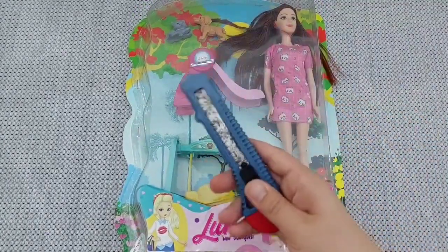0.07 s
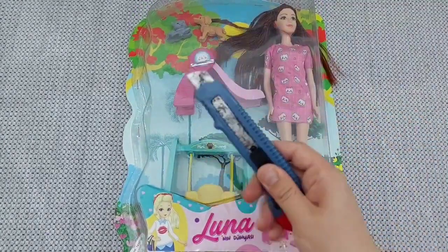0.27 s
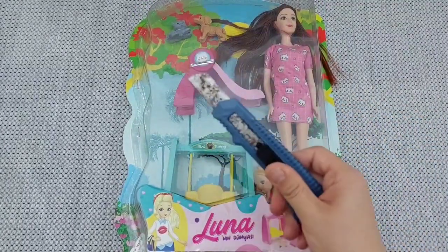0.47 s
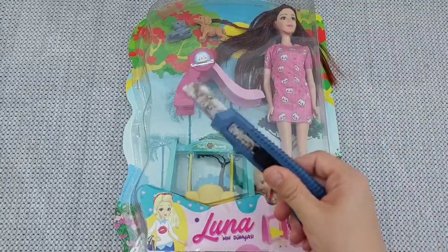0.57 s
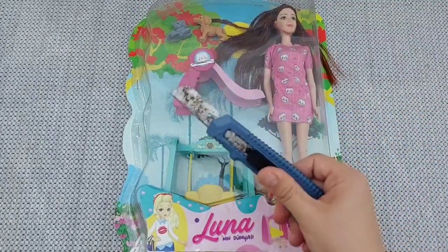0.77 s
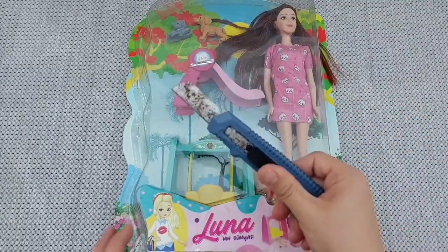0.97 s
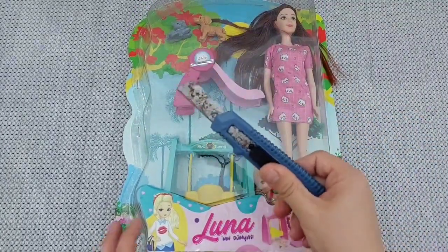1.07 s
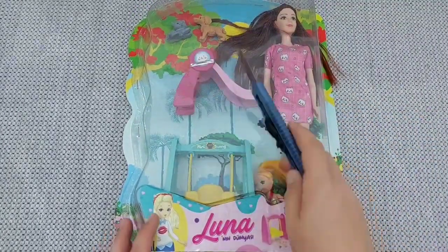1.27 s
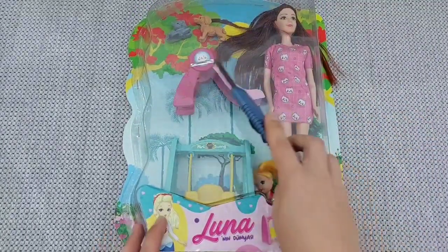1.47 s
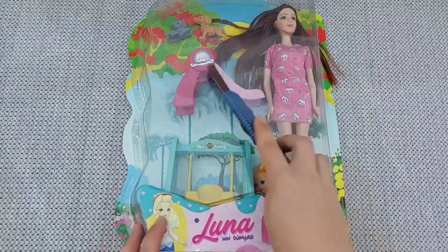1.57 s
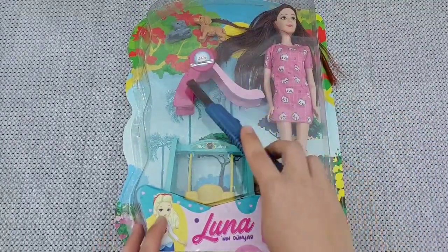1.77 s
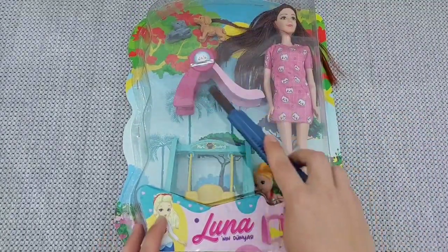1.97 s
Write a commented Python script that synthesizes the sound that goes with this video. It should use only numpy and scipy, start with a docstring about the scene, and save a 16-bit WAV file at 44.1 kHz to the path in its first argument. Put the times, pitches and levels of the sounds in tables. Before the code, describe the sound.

A snap-off utility knife is pushed open with a run of crisp ratchet clicks that slow down; after a pause and faint brushing, the tip lands on a hollow plastic pack, close stereo microphone, quiet room.

```python
"""A snap-off knife's slider, pushed by hand: the spring catch snaps over eleven notches, slowing down.
Bursts of tiny random knocks ring the modes of handle and blade, with a low jolt under each snap.
After a pause the blade tip lands on a hollow plastic pack: soft pushes thump its modes, dry cracks top
the landing, and shaped noise scrapes its skin. Filtered noise makes the rubbing, the brushing and the
quiet room with its low hum; all is heard close by a pair of microphone ports."""
import sys
import numpy as np
from scipy import signal
from scipy.fft import rfft, irfft
from scipy.io import wavfile

SR = 44100
rng = np.random.default_rng(int(sys.argv[2]) if len(sys.argv) > 2 else 0)


def store_wav(level_fs):
    """Save 16-bit WAV to argv[1]."""
    pcm = np.round(np.clip(np.atleast_2d(level_fs), -1, 1) * 32767)
    wavfile.write(sys.argv[1], SR, pcm.T.astype(np.int16))


N = 88288  # length in samples


def amp(db):
    """Decibels to linear gain."""
    return 10 ** (np.asarray(db) / 20)


def evened(x):
    """Scale to an RMS of one, so that a later gain sets the level."""
    return x / np.sqrt(np.mean(x ** 2) + 1e-20)


def read(points, hz):
    """Read a curve over frequency, interpolated along log frequency."""
    f, value = np.transpose(points)
    return np.interp(np.log(hz + 1), np.log(f + 1), value)


def level(curve):
    """A level curve as gain, all but silent outside its span."""
    s, db = np.transpose(curve)
    return amp(np.interp(np.arange(N) / SR, s, db, left=-140, right=-140))


def add(mix, s, sound):
    """Lay a sound into the mix from time s, cut off at the end."""
    part = mix[..., round(s * SR):][..., :sound.shape[-1]]
    part += sound[..., :part.shape[-1]]


def coloured(x, gain_of_hz):
    """Filter by a gain over frequency, without phase shift."""
    hz = np.fft.rfftfreq(x.shape[-1], 1 / SR)
    return irfft(rfft(x) * gain_of_hz(hz), x.shape[-1])


def bell(hz, centre_hz, width_hz):
    """Resonance-shaped gain peak."""
    return 1 / np.sqrt(1 + (2 * (hz - centre_hz) / width_hz) ** 2)


def pair(length, same):
    """Noise for two ports that share part of it."""
    a, b = rng.standard_normal((2, length))
    same = np.clip(same, 0, 1)
    return np.array([a, same * a + np.sqrt(1 - same ** 2) * b])


def ring(modes, t):
    """One dying sine for each mode."""
    hz, db, t60 = np.transpose(modes)[:, :, None]
    return amp(db - 60 * t / t60) * np.sin(2 * np.pi * hz * t)


# Left-right likeness of near sounds: (f/Hz, likeness 0-1)
NEAR_LIKENESS = [(800, 0.75), (2500, 0.56), (5000, 0.029), (9000, 0.0045), (14000, 0.6)]


def ports(a, b, likeness):
    """Left hears a; right hears a share of it by frequency, the rest is b."""
    def same(hz):
        return np.clip(read(likeness, hz), -.99, .99)

    shared = coloured(a, same)
    own = coloured(b, lambda hz: np.sqrt(1 - same(hz) ** 2))
    return np.array([a, shared + own])


# Spectrum of the room air, before its overall level: (f/Hz, relative level/dB per Hz)
AIR_COLOUR = [(12, -21.5), (20, 8), (58, 6.5), (91, -13), (179, 3), (206, -5), (244, 1), (521, -20),
              (729, -18.5), (1110, -21.5), (1840, -23), (2510, -28), (16500, -33)]
# Left-right likeness of room sounds: (f/Hz, likeness 0-1)
ROOM_LIKENESS = [(60, .85), (250, .95), (700, .7), (3000, .3)]
AIR_DB = -67.5  # RMS level


def air():
    """Room rumble and faint hiss: steady noise under one broad spectrum."""
    both = ports(*rng.standard_normal((2, N)), ROOM_LIKENESS)
    return amp(AIR_DB) * evened(coloured(both, lambda hz: amp(read(AIR_COLOUR, hz))))


# Bands of the low hum: (f/Hz, width/Hz, RMS level/dB)
HUM_BANDS = [(59.78, 12, -76), (127, 6.4, -75)]


def hum():
    """Wavering hum: noise so narrow that it drifts like an unsteady tone."""
    out = np.zeros((2, N))
    for f, width, db in HUM_BANDS:
        band = coloured(pair(N, 0.54), lambda hz: bell(hz, f, width) ** 2)
        out += amp(db) * evened(band)
    return out


# The slider rubs before it snaps, one list a rub: (t/s, level/dB)
CREEP_CURVES = [
    [(0.0, -106), (0.04, -75), (0.11, -79)],
    [(0.732, -73), (0.738, -60), (0.748, -58)],
]


def creep():
    """Faint rubbing in the body of the handle: noise around one resonance."""
    rub = evened(coloured(pair(N, 0.7), lambda hz: bell(hz, 1850., 280.0) ** 2))
    return sum(level(curve) for curve in CREEP_CURVES) * rub


# Small ticks, before the skin's colour: (t/s, drive level/dB)
SKIN_TICKS = [(0.021, -61.5), (1.661, -50), (1.669, -40.5), (1.68, -47.5), (1.701, -43.5), (1.728, -36.5),
              (1.734, -47), (1.866, -65)]
# The scrape, before its grit and the skin's colour: (t/s, drive level/dB)
SCRAPE_CURVE = [(1.645, -89), (1.665, -56.5), (1.72, -61), (1.745, -65.5), (1.8, -83)]
# Resonances of the skin under the tip: (f/Hz, width/Hz, relative level/dB)
SKIN_BANDS = [(1092, 120, -0.5), (2650, 350, 2.5), (4257, 120, 1.5), (6185, 190, -4), (7160, 210, -2.5),
              (10630, 400, -3.5), (13340, 1200, -21)]
SKIN_BROAD_DB, SKIN_DB = -12.5, 5  # floor between the resonances, gain of the whole
TICK_T60 = 0.017  # s
SETTLE_DB, SETTLE_T60 = -32.5, 0.25  # after each landing crack: dB relative to it, s


def skin():
    """Gritty noise scrapes, ticks and settles through the resonances of the pack's skin."""
    grit = amp(3.46 * rng.exponential(1, N))  # a random lift in dB for every sample
    drive = level(SCRAPE_CURVE) * grit
    for s, db in SKIN_TICKS:
        add(drive, s, amp(db - 60 * np.arange(2000) / SR / TICK_T60))
    for s, db in LANDING_CRACKS:
        add(drive, s, amp(db + SETTLE_DB - 60 * np.arange(12000) / SR / SETTLE_T60))

    def skin_gain(hz):
        peaks = sum(amp(db) * bell(hz, f, width) ** 2 for f, width, db in SKIN_BANDS)
        low_cut = hz ** 2 / (hz ** 2 + 360.0 ** 2)
        return amp(SKIN_DB) * (amp(SKIN_BROAD_DB) + peaks) * low_cut

    return coloured(ports(*(drive * rng.standard_normal((2, N))), NEAR_LIKENESS), skin_gain)


# Decay of the room: (f/Hz, t60/s)
ROOM_DECAY = [(300, 0.75), (1300, 0.18), (3500, 0.31), (9000, 0.21), (13000, 0.23), (16000, 0.19)]
ROOM_START_S = 0.002  # fade-in of the tails


def room(x):
    """Dense random tails, each band dying at its own speed.

    Three take turns, so that no single random tail colours every sound."""
    out, turn = 0, np.arange(N) / SR * 2 * np.pi * 5.
    for k in range(3):
        noise = ports(*rng.standard_normal((2, SR // 2)), ROOM_LIKENESS)
        hz, t, bands = signal.stft(noise, SR, nperseg=128)
        decay = amp(-60 * t / read(ROOM_DECAY, hz)[:, None])
        tail = signal.istft(bands * decay, SR, nperseg=128)[1]
        tail *= np.clip(np.arange(tail.shape[1]) / SR / ROOM_START_S, 0, 1) ** 2
        tail /= np.linalg.norm(tail, axis=1, keepdims=True)
        share = np.sqrt(2 / 3) * np.cos(turn + k * np.pi / 3)  # the three powers add up to one
        out = out + signal.fftconvolve(x * share, tail, axes=1)[:, :N]
    return out


# The snaps: (t/s, relative level/dB, then relative level/dB of the low, grip, body, middle, blade and
# top groups of modes, left-right difference/dB, chatter/s, relative jolt level/dB, blade ping f/Hz)
SNAPS = [(0.1272, -13, -33.5, -22.5, -19, -8.5, -9.5, -8, 1, 0.0022, -58.5, 4920),
         (0.1592, -12.5, -30.5, -17, -11, -9, -9, -8, 0.5, 0.0034, -56.5, 4380),
         (0.208, -14.5, -34.5, -9.5, -9, -8, -6, -7.5, -0.5, 0.0036, -53, 4240),
         (0.2511, -2.5, -39.5, -23.5, -21, -19, -17, -21.5, -1, 0.0037, -55, 4360),
         (0.2933, -4, -44.5, -31.5, -25, -10.5, -18.5, -18, 0.0, 0.0022, -52, 4540),
         (0.3398, -17.5, -35.5, -23.5, -12, -0.5, -2.5, -5.5, 3.5, 0.0041, -56, 4800),
         (0.3848, -8, -32.5, -36, -26, -28.5, -8, -8.5, 1, 0.0027, -55, 4700),
         (0.4389, -17, -36, -41.5, -8, -13, 2, -4.5, 0.5, 0.0054, -55.5, 4600),
         (0.5135, -13.5, -11.5, -9, -16.5, -10, -14, -14, 1, 0.0029, -60, 4650),
         (0.6175, -10.5, -34.5, -62, -23.5, -21, -17.5, -18, 0.5, 0.0033, -71, 4360),
         (0.7509, -21.5, -10, -45, -10, -9.5, -10, -7, 0.5, 0.002, -72, 5180)]
# Centres of those six groups: (f/Hz each)
GROUP_CENTRES = (1000, 1500, 2400, 4500, 7000, 11000)
# Modes of handle and blade, before detuning: (f/Hz, relative level/dB, t60/s)
KNIFE_MODES = [(1024.5, 1, 0.011), (1410, -19.5, 0.01), (1936, -5.5, 0.021), (2418, 1.5, 0.011),
               (2832, -0.5, .004), (3885, -14, 0.0012), (5130, -1.5, 0.0028), (5900, -1, 0.0011),
               (7260, 4, 0.003), (9426, 2.5, 0.0017), (10630, -1, 0.0044), (11770, -0.5, 0.0018),
               (13170, -9, 0.0013)]
KNIFE_DB, DETUNE = 16.5, 0.025  # gain of all snaps; largest random shift of a mode, as a fraction
THIN_HZ = 1375  # the knife sounds thin below this
LEAD_S, LEAD_DB, LEAD_RISE_DB = .004, -11.5, 26  # grating: length, middle level, rise
CHATTER_PER_S, SAG_DB, CHATTER_T60 = 22000, -4, 0.011  # mean knock rate, sag during chatter, s after it
REBOUND_S, REBOUND_DB, REBOUND_WIDTH_S = 0.0081, -16.5, 0.0028  # delay before its random stretch
RATTLE_PER_S, RATTLE_DB, RATTLE_T60 = 550, -2, .12  # mean knock rate, dB, s
PING_DB, PING_T60 = 1., 0.011  # dB before the group level, s
JOLT_DB, JOLT_HZ = 8, 285  # gain of all jolts, lower pitch


def catch_knocks(t, chatter_s):
    """The catch grates up the tooth, drops, chatters and rebounds once; the loose blade rattles on."""
    grating = amp(LEAD_DB + LEAD_RISE_DB * (t / LEAD_S - 0.5))
    sag = SAG_DB * np.minimum((t - LEAD_S) / chatter_s, 1)
    chatter = amp(sag - 60 * np.maximum(t - LEAD_S - chatter_s, 0) / CHATTER_T60)
    shape = np.where(t < LEAD_S, grating, chatter)
    rebound_s = LEAD_S + REBOUND_S * rng.uniform(.8, 1.5)
    shape += amp(REBOUND_DB) * np.exp(-((t - rebound_s) / REBOUND_WIDTH_S) ** 2)
    hits = rng.random(len(t)) < CHATTER_PER_S / SR
    knocks = shape * hits * rng.standard_normal((2, len(t)))
    loose_hits = (t > LEAD_S) * (rng.random(len(t)) < RATTLE_PER_S / SR)
    rattle = loose_hits * amp(RATTLE_DB - 60 * t / RATTLE_T60)
    return knocks + rattle * rng.standard_normal((2, len(t)))


def notch(s, db, low_db, grip_db, body_db, mid_db, blade_db, top_db, pan_db, chatter_s, jolt_db, ping_hz):
    """One snap: the catch's tiny knocks ring the knife and jolt the hand; gives its start and sound."""
    t = np.arange(2048) / SR
    knocks = catch_knocks(t, chatter_s)
    modes = np.array(KNIFE_MODES + [(ping_hz, PING_DB, PING_T60)])
    modes[:-1, 0] *= 1 + DETUNE * rng.uniform(-1, 1, len(KNIFE_MODES))  # the ping keeps its pitch
    groups = list(zip(GROUP_CENTRES, (low_db, grip_db, body_db, mid_db, blade_db, top_db)))
    gains = amp(modes[:, 1] + read(groups, modes[:, 0]))
    rung = signal.fftconvolve(knocks[:, None], ring(modes, t)[None], axes=2)[..., :len(t)]
    # even out each mode's energy, so its gain alone sets its strength
    rung *= (gains / np.linalg.norm(rung, axis=2))[..., None]
    both = ports(*rung.sum(1), NEAR_LIKENESS)
    knife = coloured(both, lambda hz: 1 / (1 + (THIN_HZ / (hz + 1)) ** 5))
    jolt_modes = [(JOLT_HZ, 0, .04), (1.4 * JOLT_HZ, -4, .03)]
    jolt = ring(jolt_modes, np.maximum(t - LEAD_S, 0)).sum(0)
    sides_db = pan_db * np.array([[.5], [-.5]])
    return s - LEAD_S, amp(db + KNIFE_DB + sides_db) * knife + amp(jolt_db + JOLT_DB) * jolt


# Rise and fall of the mid band of the background: (t/s, level/dB)
MID_FLOOR_CURVE = [(0.9, -96.5), (1.698, -68), (2.0, -89)]


def mid_floor():
    """The mid band of the background noise rises and falls."""
    mids = coloured(pair(N, 0.98), lambda hz: bell(hz, 690.0, 690.0) ** 2)
    return level(MID_FLOOR_CURVE) * evened(mids)


# Swell of the brushing: (t/s, level/dB)
RUSTLE_CURVE = [(1.15, -91), (1.162, -77), (1.22, -79), (1.33, -89.5)]
# Crisp ticks in the brushing: (t/s, level/dB)
RUSTLE_TICKS = [(1.178, -70.5), (1.189, -61.5), (1.212, -67.5)]
# Spectrum of the brushing, before its overall level: (f/Hz, relative level/dB per Hz)
RUSTLE_SPECTRUM = [(880, -41.5), (1500, -7.5), (2860, 4.5), (4920, 4), (16000, -17)]
BRUSH_T60 = 0.019  # s


def rustle():
    """A sleeve or finger brushes faintly, with a few crisp ticks: noise under one moving level."""
    gain = level(RUSTLE_CURVE)
    for s, db in RUSTLE_TICKS:
        add(gain, s, amp(db - 60 * np.arange(2000) / SR / BRUSH_T60))
    return gain * evened(coloured(pair(N, 0.23), lambda hz: amp(read(RUSTLE_SPECTRUM, hz))))


# Soft pushes on the pack: (t/s, relative level/dB)
PACK_PUSHES = [(1.5468, -26.5), (1.5567, -18), (1.5669, -23.5), (1.5777, -35.5), (1.681, -32.5),
               (1.728, -36), (1.916, -44)]
# The tip presses and drags on the pack: (t/s, relative level/dB)
PRESS_CURVE = [(1.55, -41), (1.6, -45), (1.66, -60.5), (1.75, -64.5), (1.83, -82)]
# Modes of the hollow pack: (f/Hz, relative level/dB, t60/s)
PACK_MODES = [(201.3, -32, 0.14), (263.4, -9, 0.074), (281, 3.5, 0.041), (354.6, -0.5, 0.037),
              (467, -6.5, 0.068), (570.8, -14, 0.11), (812, -14.5, 0.043), (985, -27, 0.069),
              (1142, -15.5, 0.064)]
PUSH_S, PACK_DB, PRESS_DB = 0.00043, -14.5, -32.5  # push length, gain of pushes, gain of dragging
PACK_LOW_HZ = 160  # the small pack radiates no deep bass


def pack():
    """Soft pushes and the noise of the dragging tip ring the modes of the hollow pack."""
    drive = amp(PRESS_DB) * level(PRESS_CURVE) * rng.standard_normal(N)
    push = np.hanning(round(PUSH_S * SR))
    for s, db in PACK_PUSHES:
        add(drive, s, amp(db + PACK_DB) * push / push.sum())
    side = (-1.) ** np.arange(len(PACK_MODES))  # modes lean left and right by turns
    gains = 1 + 0.093 * np.array([side, -side])
    body = gains @ ring(PACK_MODES, np.arange(12000) / SR)
    rung = signal.fftconvolve(drive[None], body, axes=1)[:, :N]
    return signal.lfilter(*signal.butter(2, PACK_LOW_HZ, "high", fs=SR), rung)


# Dry cracks as the tip lands, before their colour: (t/s, drive level/dB)
LANDING_CRACKS = [(1.5476, -23.5), (1.55, -24)]
# Spectrum of a crack that does not ring: (f/Hz, gain/dB)
CRACK_COLOUR = [(530, -34), (900, -6.5), (1200, -5.5), (3770, -19.5), (6250, -14), (16000, -37)]


def landing():
    """The tip lands with dry cracks: short dying noise, coloured but not rung."""
    gain = np.zeros(N)
    for s, db in LANDING_CRACKS:
        add(gain, s, amp(db - 60 * np.arange(12000) / SR / TICK_T60))
    both = ports(*(gain * rng.standard_normal((2, N))), NEAR_LIKENESS)
    return coloured(both, lambda hz: amp(read(CRACK_COLOUR, hz)))


ROOM_DB = -10  # room level against the near sounds


def scene():
    """Knife and pack, alone sent to the room, over the faint rubbing, brushing and room noise."""
    near = skin() + pack() + landing()
    for row in SNAPS:
        add(near, *notch(*row))
    background = air() + hum() + mid_floor()
    return near + amp(ROOM_DB) * room(near) + creep() + rustle() + background


EDGE_HZ, SOFT_EDGE_HZ = 16600, 15650  # steep edge, shoulder


def record(dry):
    """The band limit: a shoulder, then a steep edge."""
    soft = coloured(dry, lambda hz: .03 + .97 / np.sqrt(1 + (hz / SOFT_EDGE_HZ) ** 200))
    edge = signal.firwin(511, EDGE_HZ, window=("kaiser", 9), fs=SR)
    return signal.oaconvolve(soft, edge[None], "same")


dry = scene()
out = record(dry)
store_wav(out)
```